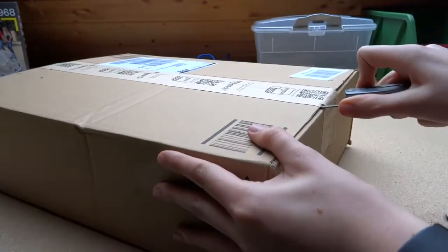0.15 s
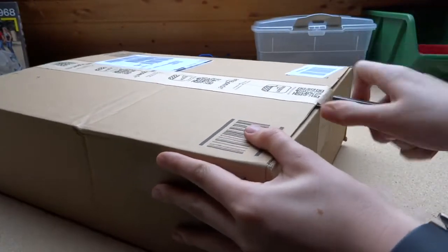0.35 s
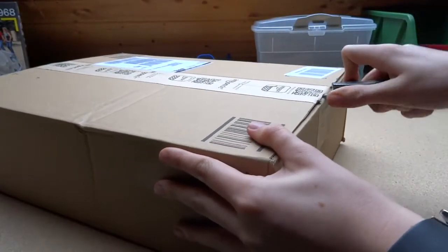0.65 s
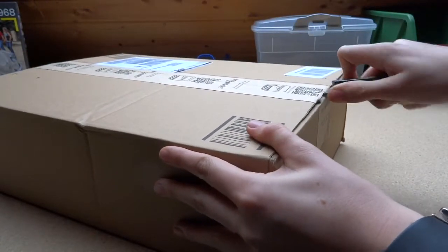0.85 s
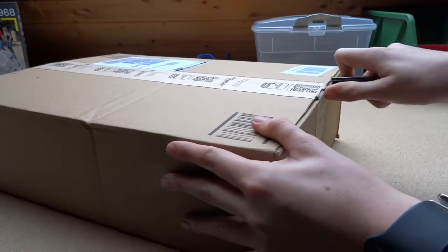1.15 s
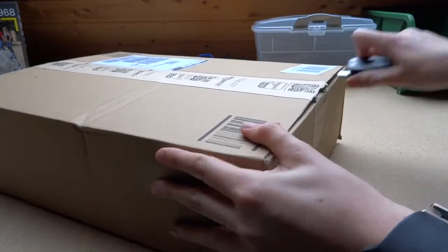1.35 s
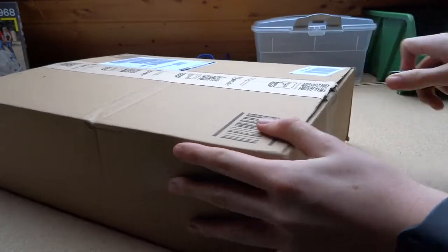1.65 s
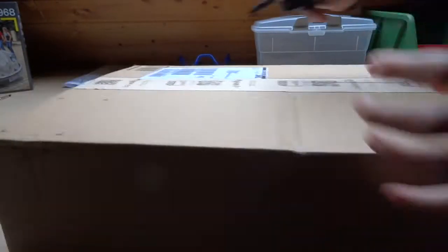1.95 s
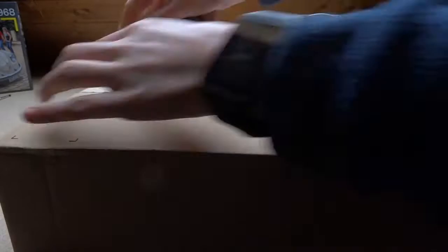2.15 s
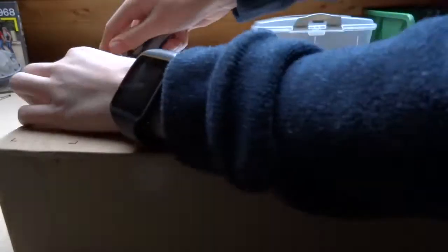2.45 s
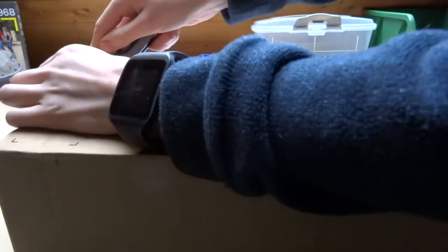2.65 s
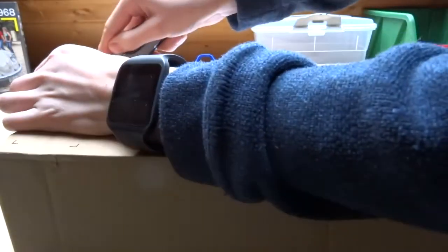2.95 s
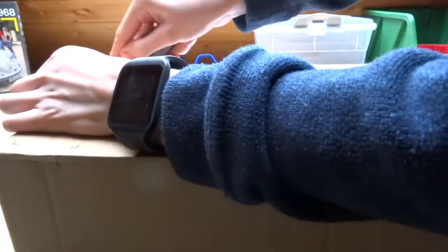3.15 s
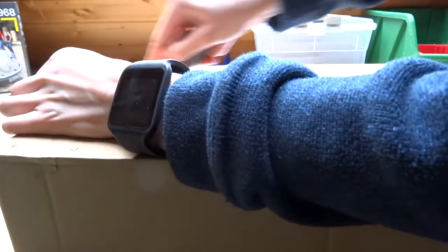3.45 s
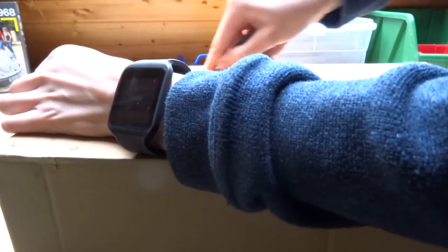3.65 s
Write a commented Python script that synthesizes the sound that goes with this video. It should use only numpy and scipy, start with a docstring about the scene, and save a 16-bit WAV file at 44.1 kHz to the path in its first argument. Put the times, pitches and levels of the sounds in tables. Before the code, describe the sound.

A knife jerks through tape on a hollow cardboard box, scraping, clicking and rasping up close

```python
"""At a cardboard box in a still room, close to a two-port microphone: a small blade is pushed in jerks
through packing tape. Every contact is a stream of tiny stick-slip clicks: the tape answers with a bright
hiss, the card with a dry scratch, the hollow box with low modes. Midway the box is slid round with a squeak,
a fluttering tone with its octave; then the long cut begins. Reflections and faint steady noise lie behind."""
import sys
import numpy as np
from scipy import signal
from scipy.fft import irfft
from scipy.io import wavfile
from scipy.ndimage import uniform_filter1d

SR = 44100
rng = np.random.default_rng(int(sys.argv[2]) if len(sys.argv) > 2 else 0)


def magnitude_from_level(level_db):
    """Linear magnitude for a level in decibels (20 dB per decade)."""
    exponent = np.asarray(level_db, float) / 20
    return 10 ** exponent


def bounce(signal):
    """Save signal as a 16-bit WAV file at the path given by the first command-line argument."""
    frames = np.transpose(np.atleast_2d(signal))
    limited = np.clip(frames, -1, 1)
    pcm = np.round(limited * 32767).astype(np.int16)
    wavfile.write(sys.argv[1], SR, pcm)


N = 167580

# jerks of the blade and taps of the hand:
# start_s, scratch_db (before JERK_GAIN_DB), box_db and tape_db (re scratch), hold_s
JERKS = [(0.294, -27.5, -16, 20.5, 0.005), (0.415, -19.5, -3.5, 1, 0.0056), (0.429, -21, -11, -16, 0.013),
         (0.485, -10, 0.5, 6.5, 0.023), (0.615, -38, 1.5, 12.5, 0.0025), (0.717, -31, -25, 5, 0.0072),
         (0.852, -34.5, 12.5, 20, 0.0059), (0.859, -15, -4, 3, 0.031), (0.9208, -16.5, -11, 6, 0.0086),
         (1.11, -29.5, 2, 0, 0.042), (1.321, -9.5, -2.5, 2, 0.02), (1.346, -14, -0.5, 9, 0.037),
         (1.388, -7.5, -5.5, -0.5, 0.0114), (1.506, -15.5, -5, -13, 0.0038), (1.782, -32, -25, 18.5, 0.015),
         (1.806, -14.5, -37, 2.5, 0.027), (2.236, -40, 5.5, 0, 0.0051), (2.387, -36.5, 0, -24, 0.0039),
         (2.445, -27.5, 2.5, -7.5, 0.0053), (2.679, -38.5, 0.5, 1, 0.0056), (2.763, -27, -17.5, -6.5, .022),
         (3.068, -28.5, -12, 6, 0.0054), (3.083, -21.5, -4, -2.5, 0.013), (3.171, -28, -13, 4.5, 0.0066),
         (3.208, -17, -8.5, -1, 0.0067), (3.262, -18.5, -8, 3, 0.0088), (3.303, -28.5, -1, 4, 0.0075),
         (3.34, -9.5, -10, -8.5, 0.0057), (3.365, -10.5, 2, 0, 0.008), (3.391, -17.5, -0.5, 2, 0.015),
         (3.43, -16, 7.5, 1.5, 0.0086), (3.455, -12.5, 3.5, -1, 0.0049), (3.478, -14.5, 10.5, 2.5, 0.0072),
         (3.503, -12.5, 4, 0, 0.012), (3.519, -16.5, 7, 4.5, 0.016), (3.545, -12.5, 11, 3.5, 0.0105),
         (3.569, -8, -3, -6, 0.011), (3.781, -17.5, 13.5, 6, 0.0076)]
# steady rubbing of hands, blade and box bottom: time_s, scratch_db, tape_db (re scratch)
RUB = [(0, -48.5, 1.5), (0.101, -52, 4), (.15, -43, 7.5), (.26, -44.5, 4.5), (.33, -48, 7),
       (.46, -41.5, 3.5), (0.549, -38, 5), (.61, -49.5, -0.5), (.7, -63.5, 14), (.74, -49.5, 11),
       (.84, -47.5, -2.5), (.915, -39, 3), (1.0, -47.5, 0.5), (1.09, -44, 6.5), (1.229, -51, -4.5),
       (1.42, -29, 0), (1.49, -39, -2), (1.596, -46.5, 1), (1.73, -38, 9.5), (1.86, -37, 8.5),
       (2.061, -45.5, 4.5), (2.12, -56, -2), (2.22, -67, 5.5), (2.31, -58, 4), (2.38, -62, 1.5),
       (2.47, -50.5, -4), (2.59, -50.5, 0), (2.64, -59, -1.5), (2.76, -66, 1), (2.94, -45.5, -4.5),
       (3.0, -53.5, -1.5), (3.02, -47, 1.5), (3.15, -48.5, 0.5), (3.49, -33, 2), (3.598, -24, -4),
       (3.658, -34, -1.5), (3.8, -24, -2)]
# squeaks, and groans of the card under the dragging blade:
# start_s, length_s, level_db, pitch_hz, octave_db (re first partial)
SQUEAKS = [(1.72, .042, -29, 1230, -5), (1.82, .02, -32, 1215, 11), (1.34, .056, -18, 300, -6),
           (1.408, .022, -27, 1250, -12), (3.725, .022, -24, 780, -12)]
# relative spectrum of the card: freq_hz, near_end_db, after_turn_db
CARD = [(120, -50, -58.5), (346, 0, -5), (710, 0, 2.5), (1400, 7, 1.5), (2350, 0, 2), (3260, -4.5, -7.5),
        (5350, -16.5, -32.5)]
# relative spectrum of the tape: freq_hz, near_end_db, after_turn_db
TAPE = [(1500, -7, -40), (3120, 7, 13), (4200, 5, 5), (5000, 8, 8.5), (7100, 9, 7), (7840, 6.5, 4.5),
        (10400, 13.5, 9), (10200, 11.5, 7)]
# relative modes of box panels and air: freq_hz, near_end_db, after_turn_db, t60_s
BOX = [(174, -3.5, -10, 0.029), (239.3, 2.5, -0.5, 0.056), (310, -1, -2, 0.036), (367, -1, 1, 0.052),
       (469, 3.5, 4.5, 0.033), (578, 6.5, 6.5, 0.016), (715.6, -2.5, -5.5, 0.066), (807, -2, -3, 0.05),
       (992, 4, 1, 0.023)]
# modes of the blade, creeping in lightly held: freq_hz, level_db (re tape)
BLADE = [(3300, -14), (5400, -9), (9800, -10)]
# relative spectrum of the still room: freq_hz, density_db (per Hz)
FLOOR = [(30, -5), (240, -7), (1500, 1), (4500, -23)]
# balance of the ports: freq_hz, left_minus_right_db
LEAN = [(300, 0), (1500, 1), (11000, -1.5)]

CLICKS_PER_S, CLICK_SPREAD_DB = 7500, 2.8
RISE_HOLDS, FALL_60DB_HOLDS, JERK_GAIN_DB = 0.16, 4.2, -14
SNAP_DB, SNAP_HOLD_S = 17, 0.01  # first slip re jerk, for a hold of SNAP_HOLD_S
RUB_BOX_DB = -8.5  # re scratch
TURN_S, CREEP_S = 1.65, (2.88, 3.13)
BLADE_T60_S = 0.007
PATCH_RMS_DB = 2.2
SQUEAK_WAVER = 0.04  # pitch deviation, fraction
ROOM_T60_S, ROOM_DB, ROOM_SIDE_HZ = 0.1, -9, 1500
FLOOR_GAIN_DB, FLOOR_SIDE = -58.5, 0.47
BASS_CUT_HZ, TREBLE_EDGE_HZ = 111, 11100


def evened(x):
    """Scale to rms 1."""
    return x / np.sqrt(np.mean(x ** 2) + 1e-20)


def read(points, hz):
    """Interpolate (Hz, dB) points over log frequency."""
    f, value = np.transpose(points)
    return np.interp(np.log(hz + 1), np.log(f + 1), value)


def add(mix, start_s, sound):
    """Add a sound in place, cut at the end of the mix."""
    part = mix[..., round(start_s * SR):][..., :sound.shape[-1]]
    part += sound[..., :part.shape[-1]]


def causal(points):
    """Minimum-phase response of a spectrum, energy 1."""
    hz = abs(np.fft.fftfreq(4096, 1 / SR))
    log_gain = np.log(magnitude_from_level(read(points, hz)))
    phase = -signal.hilbert(log_gain).imag
    taps = np.fft.ifft(np.exp(log_gain + 1j * phase)).real[:2048]
    return taps / np.linalg.norm(taps)


def clicks():
    """Dense stick-slip clicks; card, box and tape feel them with their own signs."""
    size = magnitude_from_level(CLICK_SPREAD_DB * np.minimum(rng.exponential(1, N), 5))
    slips = rng.random(N) < CLICKS_PER_S / SR
    signs = rng.choice([-1., 1.], (3, N))
    return evened(size * slips) * signs


def force():
    """Drive into card, box, tape: rubbing plus jerks; longer holds rise and fall slower, snap more softly."""
    time_s, scratch_db, rub_tape_db = np.transpose(RUB)
    now = np.arange(N) / SR
    levels_db = [scratch_db + rel_db for rel_db in (0, RUB_BOX_DB, rub_tape_db)]
    power = np.array([magnitude_from_level(2 * np.interp(now, time_s, level_db)) for level_db in levels_db])
    snaps = np.zeros((3, N))
    t = np.arange(9000) / SR
    for start_s, jerk_db, box_db, tape_db, hold_s in JERKS:
        rise = np.minimum(t / (RISE_HOLDS * hold_s), 1)
        fall = magnitude_from_level(-60 * np.maximum(t - hold_s, 0) / (FALL_60DB_HOLDS * hold_s))
        strength = magnitude_from_level(JERK_GAIN_DB + jerk_db + np.array([[0], [box_db], [tape_db]]))
        add(power, start_s, (strength * rise * fall) ** 2)
        # the first slip is one large click
        snap = -strength * magnitude_from_level(SNAP_DB) * SNAP_HOLD_S / hold_s
        add(snaps, start_s + RISE_HOLDS * hold_s / 2, snap)
    return np.sqrt(power) * clicks() + snaps


def box_ring(turned):
    """The box after one click: decaying modes of alternating sign, energy 1."""
    t = np.arange(8000) / SR
    taps = np.zeros(8000)
    for k, (hz, near_db, turned_db, t60_s) in enumerate(BOX):
        level_db = turned_db if turned else near_db
        taps += (-1) ** k * magnitude_from_level(level_db - 60 * t / t60_s) * np.sin(2 * np.pi * hz * t)
    return taps / np.linalg.norm(taps)


def blade_ring():
    """The blade after one click: decaying modes, each of about energy 1 before its level."""
    t = np.arange(1024) / SR
    fade = magnitude_from_level(-60 * t / BLADE_T60_S)
    fade *= np.sqrt(2) / np.linalg.norm(fade)
    return fade * sum(magnitude_from_level(db) * np.cos(2 * np.pi * hz * t) for hz, db in BLADE)


def patchy(x):
    """The colour shifts in smoothed random patches of time and frequency as the touched spot moves."""
    z = signal.stft(x, nperseg=256, noverlap=192)[2]
    patch = uniform_filter1d(rng.standard_normal(z.shape), size=30, axis=1)
    patch = evened(uniform_filter1d(patch, size=3, axis=0))
    return signal.istft(z * magnitude_from_level(PATCH_RMS_DB * patch), nperseg=256, noverlap=192)[1][:N]


def contact():
    """The clicks ring card, box and tape, each coloured anew after the turn, and the creeping blade."""
    drive = force()
    late = np.arange(N) > TURN_S * SR
    x = np.zeros(N)
    for turned, active in enumerate((~late, late)):
        card = causal([(hz, db[turned]) for hz, *db in CARD])
        tape = causal([(hz, db[turned]) for hz, *db in TAPE])
        for push, body in zip(drive, (card, box_ring(turned), tape)):
            x += signal.oaconvolve(push * active, body)[:N]
    creeping = np.digitize(np.arange(N) / SR, CREEP_S) == 1
    x += signal.oaconvolve(drive[2] * creeping, blade_ring())[:N]
    return patchy(x)


def squeaks():
    """Brief, nearly regular slipping: a fluttering, unsteady tone with its octave."""
    out = np.zeros(N)
    for start_s, length_s, level_db, pitch_hz, octave_db in SQUEAKS:
        t = np.arange(0, length_s, 1 / SR)
        wander = uniform_filter1d(rng.standard_normal((2, 2500)), size=120)
        waver, flutter = evened(wander)[:, :len(t)]
        phase = 2 * np.pi * np.cumsum(pitch_hz * (1 + SQUEAK_WAVER * waver)) / SR
        shape = magnitude_from_level(level_db + 3 * flutter) * np.sin(np.pi * t / length_s)
        add(out, start_s, shape * (np.sin(phase) + magnitude_from_level(octave_db) * np.sin(2 * phase)))
    return out


def room(x):
    """Sparse decaying reflections, different at each port; in the bass both ports hear the same."""
    taps = np.zeros((2, 12000))
    at = np.arange(40, 11980, 20) + rng.integers(0, 20, (2, 597))
    np.put_along_axis(taps, at, rng.choice([-1., 1.], at.shape), 1)
    taps *= magnitude_from_level(-60 * np.arange(12000) / SR / ROOM_T60_S)
    mid = taps.mean(0)
    side = signal.lfilter(*signal.butter(1, ROOM_SIDE_HZ, "high", fs=SR), taps[0] - mid)
    tail = np.array([mid + side, mid - side]) / np.linalg.norm(taps[0])
    return magnitude_from_level(ROOM_DB) * signal.fftconvolve(x[None], tail, axes=1)[:, :N]


def still_room():
    """Faint steady coloured noise, partly shared by both ports."""
    mid, side = rng.standard_normal((2, N))
    pair = np.array([mid + FLOOR_SIDE * side, mid - FLOOR_SIDE * side])
    return magnitude_from_level(FLOOR_GAIN_DB) * signal.oaconvolve(pair, causal(FLOOR)[None], axes=1)[:, :N]


def scene():
    """Box and blade, their reflections and the still room."""
    near = contact() + squeaks()
    return near + room(near) + still_room()


def top_cut(x):
    """Nothing passes above the cut-off."""
    return signal.sosfilt(signal.butter(12, 12390, fs=SR, output="sos"), x)


def record(dry):
    """The ports lean with frequency; then a bass cut and a steep band limit."""
    hz = np.fft.rfftfreq(2048, 1 / SR)
    half_lean_db = read(LEAN, hz) / 2
    taps = irfft(magnitude_from_level([half_lean_db, -half_lean_db]))
    taps = np.roll(taps, 1024, axis=1) * np.hanning(2048)
    x = signal.oaconvolve(dry, taps, axes=1)[:, 1024:1024 + N]  # filter delay removed
    x = signal.sosfilt(signal.butter(4, BASS_CUT_HZ, "high", fs=SR, output="sos"), x)
    band = signal.firwin(301, TREBLE_EDGE_HZ, window=("kaiser", 6.), fs=SR)
    mix = signal.oaconvolve(x, band[None], "same")
    return top_cut(mix)


dry = scene()
out = record(dry)
bounce(out)
```